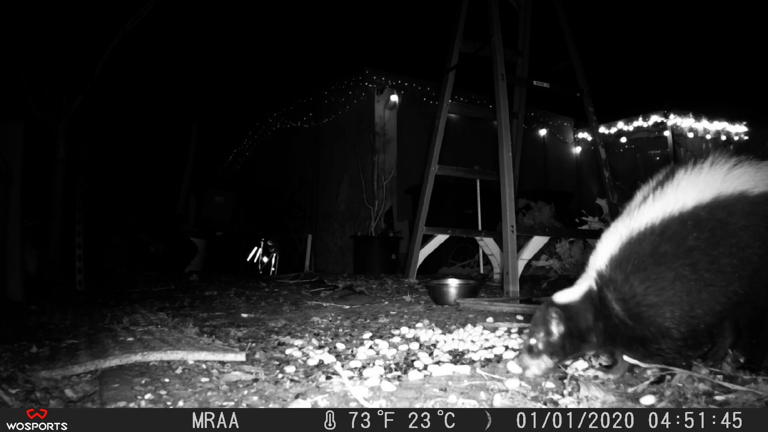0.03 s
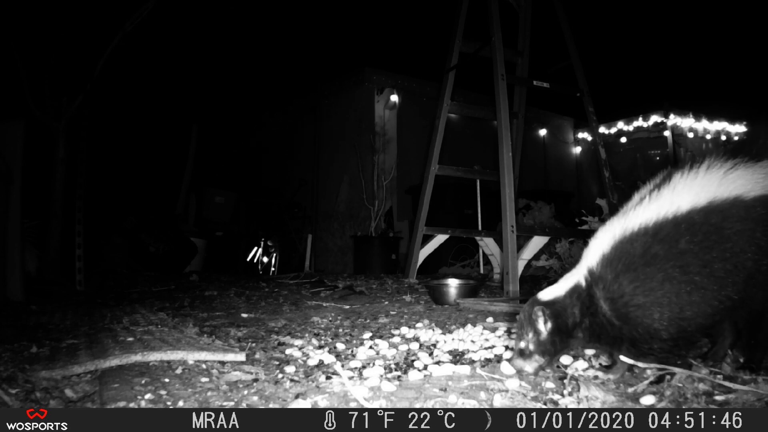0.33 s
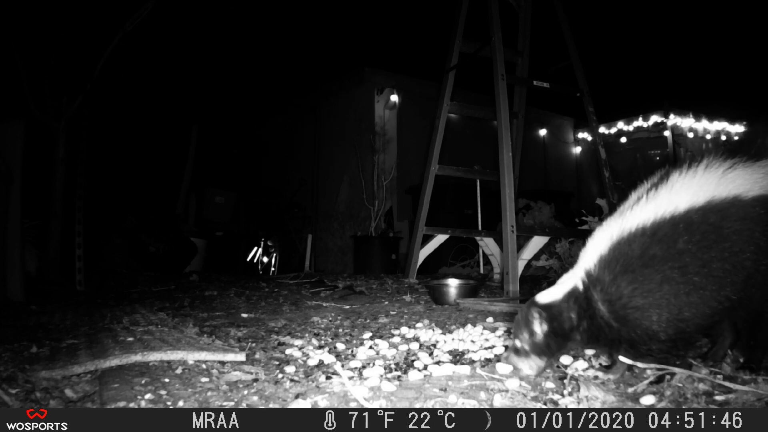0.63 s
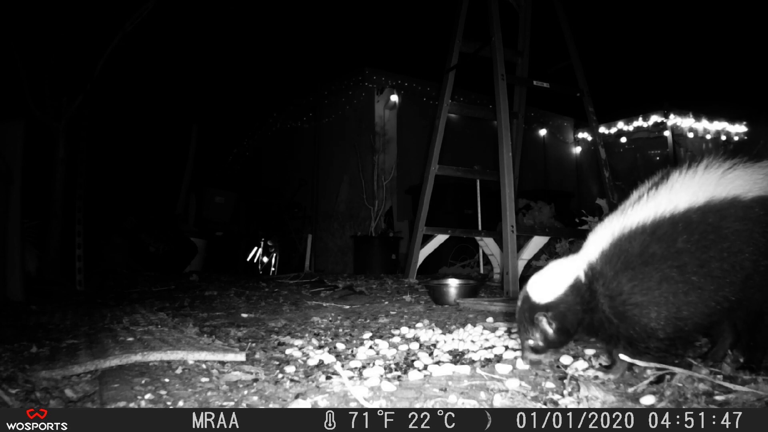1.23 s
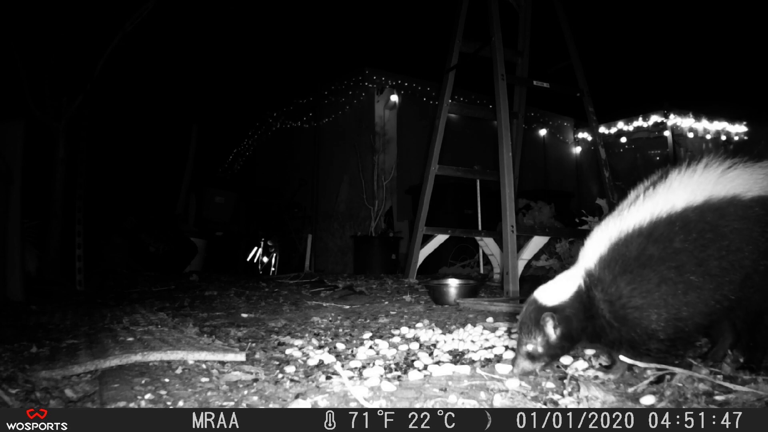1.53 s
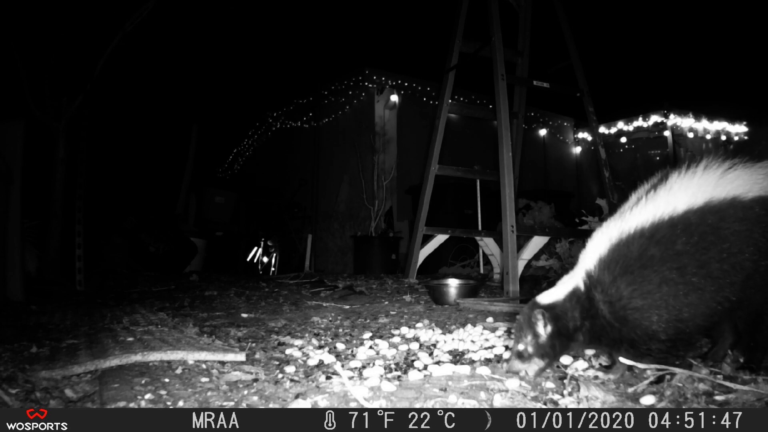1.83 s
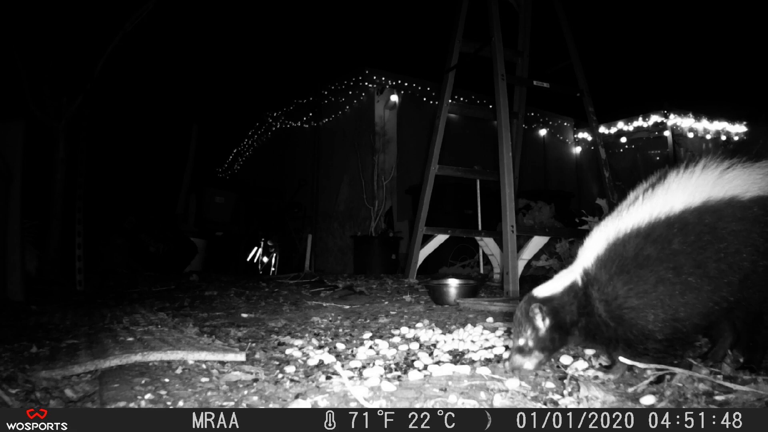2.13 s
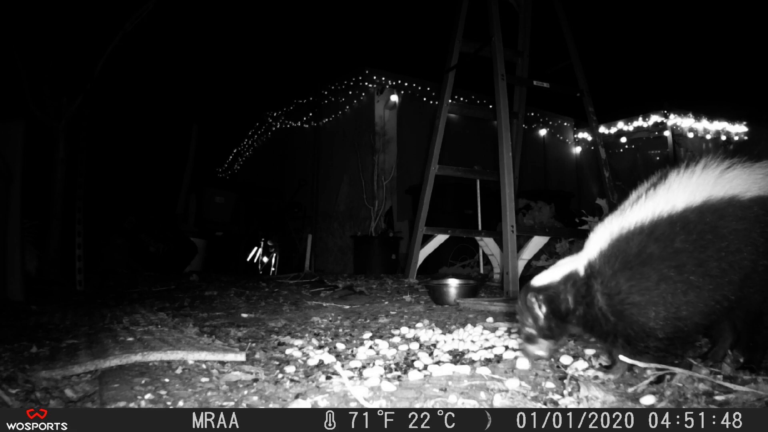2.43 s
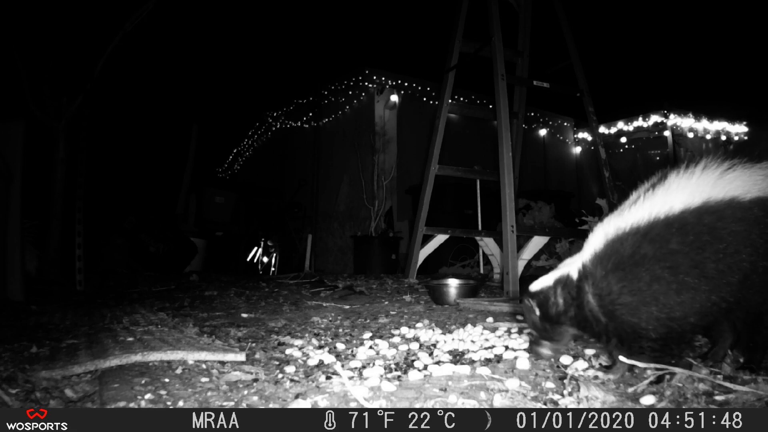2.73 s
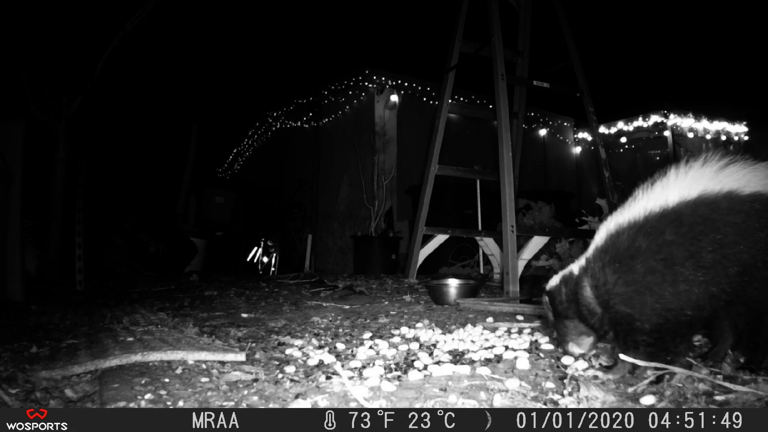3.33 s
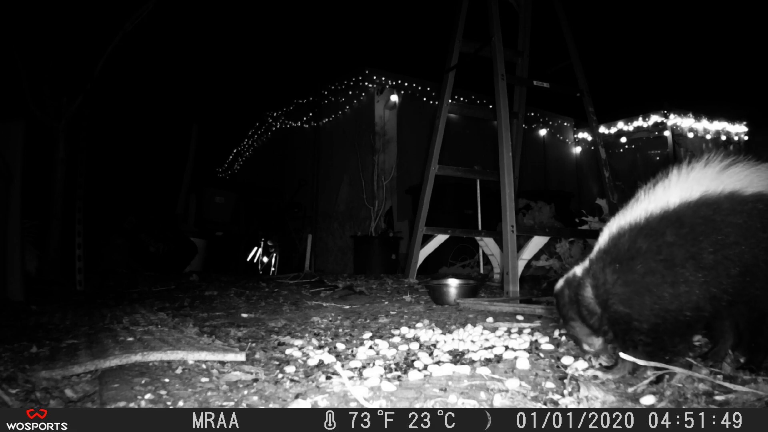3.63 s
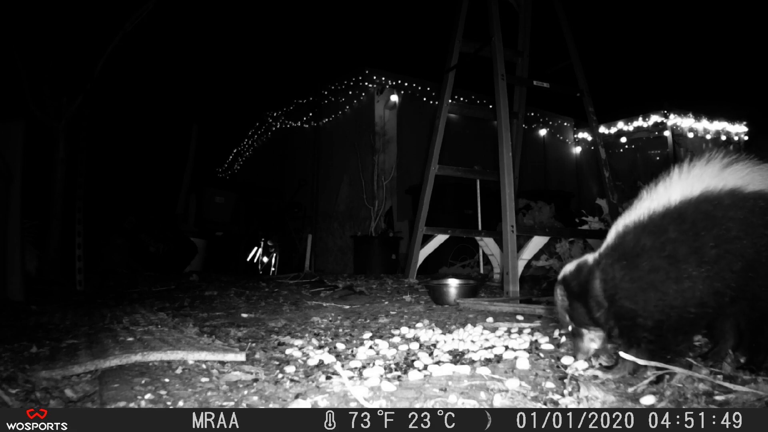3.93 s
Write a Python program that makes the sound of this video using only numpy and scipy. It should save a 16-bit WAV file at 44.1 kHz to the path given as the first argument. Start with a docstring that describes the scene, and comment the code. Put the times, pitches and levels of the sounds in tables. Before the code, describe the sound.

A skunk feeds on dry scraps close to a small microphone in a yard at night. Faint, crisp snaps come irregularly, then thicken with light rustling after one soft knock. Low rumble, distant machine hum and hiss continue underneath.

```python
"""A skunk feeds on dry scraps in a yard at night, close to a small trail camera.
From the start, crumbs snap and grit ticks over a low outdoor rumble, the hum of distant machines
and the microphone's own hiss. Just past halfway one piece knocks on the ground. From there the
snaps come thicker, and snout and paws rustle the litter until near the end."""
import sys
import numpy as np
from scipy import signal
from scipy.fft import rfft, irfft
from scipy.io import wavfile
from scipy.ndimage import uniform_filter1d

SR = 44100
rng = np.random.default_rng(int(sys.argv[2]) if len(sys.argv) > 2 else 0)


def int16_out(signal):
    """Quantize to a 16-bit WAV file."""
    q = np.round(np.clip(np.atleast_2d(signal).T, -1, 1) * 32767)
    wavfile.write(sys.argv[1], SR, q.astype(np.int16))


N = 176400


def amp(db):
    """Decibels to gain."""
    return 10 ** (np.asarray(db) / 20)


def unit(x):
    """Scales to an rms of 1."""
    return x / np.sqrt(np.mean(x ** 2) + 1e-20)


def add(mix, start_s, sound):
    """Mixes a sound in at its cue."""
    part = mix[max(round(start_s * SR), 0):][:len(sound)]
    part += sound[:len(part)]


def drift(t, top_hz):
    """A slow random modulator of rms 1, moving no faster than top_hz."""
    rates = np.geomspace(top_hz / 10, top_hz, 20)
    return unit(sum(np.sin(2 * np.pi * (hz * t + rng.random())) / np.sqrt(hz) for hz in rates))


def ring(pitch_hz, width_hz):
    """One damped mode, struck once: the wider it is, the faster it dies."""
    t = np.arange(SR // 50) / SR
    return np.exp(-np.pi * width_hz * t) * np.sin(2 * np.pi * pitch_hz * t)


def dull(x, cutoff_hz=np.inf):
    """A steep high cut, at 4010 Hz unless set lower."""
    return signal.sosfilt(signal.butter(8, min(cutoff_hz, 4010), fs=SR, output="sos"), x)


# Dry, crisp crumb snaps: start_s, peak_db, pitch_hz
CRUMB_SNAPS = [(0.0768, -49, 2550), (0.146, -59, 3800), (0.1514, -60, 3500), (0.267, -60, 3100),
               (0.2739, -47.5, 2940), (.2849, -47.5, 2900), (0.5723, -60, 3400), (0.757, -60, 3100),
               (0.8598, -59, 3300), (.911, -49.5, 3430), (1.171, -62, 4030), (1.2, -57, 2600),
               (1.2079, -53, 2320), (1.4277, -62, 3230), (1.7005, -51, 2730), (2.0603, -56, 3200),
               (2.0728, -65, 3900), (2.082, -55, 3400), (2.421, -57, 3680), (2.4603, -60, 4000),
               (2.5547, -55, 2750), (2.5709, -55, 2200), (2.664, -50, 1900), (2.6706, -57, 2900),
               (2.778, -62, 3820), (2.8084, -56, 3000), (2.8147, -39, 2700), (2.864, -59, 3600),
               (2.9334, -63, 3520), (2.978, -62, 3750), (3.0853, -53, 2800), (3.0927, -51, 2700),
               (3.3704, -50.5, 2900), (3.475, -56, 2600), (3.767, -52.5, 2580)]


def crumb_snap(peak_db, pitch_hz):
    """A crumb breaks: a bright ring of a few cycles over a duller body, with the bass cut away."""
    bright = ring(pitch_hz, width_hz=800)
    body = amp(-5) * ring(pitch_hz=980, width_hz=800)
    click = dull(bright - body, cutoff_hz=1.29 * pitch_hz)
    click = signal.sosfilt(signal.butter(2, 554, "high", fs=SR, output="sos"), click)
    return amp(peak_db) * click / abs(click).max()


# Thin, glassy ticks of grit: start_s, peak_db, pitch_hz
GRIT_TICKS = [(.1532, -79, 6800), (.2746, -82, 6900), (1.426, -72, 6930), (2.431, -77, 7100),
              (2.4601, -68.5, 7000), (2.547, -72.5, 7000), (2.7556, -71, 7100)]


def grit_tick(peak_db, pitch_hz, attack_s=0.00057):
    """A grain of grit rings briefly and very high."""
    ping = ring(pitch_hz, width_hz=350)
    t = np.arange(len(ping)) / SR
    ping *= 1 - np.exp(-t / attack_s)
    return amp(peak_db) * ping / abs(ping).max()


# Short, grainy brushes of litter: middle_s, half_length_s, level_db, centre_hz, width_hz
LITTER_RUSTLES = [(2.358, 0.049, -71, 2200, 1860), (2.438, .02, -82, 3340, 1480),
                  (2.67, 0.0065, -64.5, 2300, 1400), (2.676, 0.0087, -76, 3800, 1200),
                  (2.812, 0.01, -72, 2770, 1200), (2.908, 0.023, -77.5, 2900, 1700),
                  (3.193, 0.01, -68, 2170, 1100), (3.465, 0.011, -66.5, 2600, 890),
                  (3.763, 0.012, -76, 2520, 795)]


def litter_rustle(middle_s, half_length_s, level_db, centre_hz, width_hz, grains_per_s=3000):
    """Pushed litter gives a swelling, fading cloud of tiny clicks. Returns start_s and the sound."""
    t = np.arange(-SR // 5, SR // 5) / SR
    strengths = rng.standard_normal(len(t))
    clicks = strengths * (rng.random(len(t)) < grains_per_s / SR)
    edges_hz = [centre_hz - width_hz / 2, centre_hz + width_hz / 2]
    band = signal.butter(2, edges_hz, "band", fs=SR, output="sos")
    grains = unit(dull(signal.sosfilt(band, clicks)))
    swell = np.exp(-(t / half_length_s) ** 2 / 2)
    return middle_s + t[0], amp(level_db) * grains * swell


def scrap_knock(middle_s, half_length_s, peak_db, pitch_hz):
    """A piece hits the ground with a soft-edged, hollow knock. Returns start_s and the sound."""
    t = np.arange(-SR // 50, SR // 50) / SR
    envelope = np.exp(-(t / half_length_s) ** 2 / 2)
    return middle_s + t[0], amp(peak_db) * envelope * np.cos(2 * np.pi * pitch_hz * t)


def skunk(knock_s=2.3492, knock_hz=1090):
    """The feeding foley: snaps, ticks, rustles and one knock with a ground scuff around it."""
    foley = np.zeros(N)
    for start_s, peak_db, pitch_hz in CRUMB_SNAPS:
        add(foley, start_s, crumb_snap(peak_db, pitch_hz))
    for start_s, peak_db, pitch_hz in GRIT_TICKS:
        add(foley, start_s, grit_tick(peak_db, pitch_hz))
    for row in LITTER_RUSTLES:
        add(foley, *litter_rustle(*row))
    add(foley, *scrap_knock(knock_s, half_length_s=0.00092, peak_db=-48, pitch_hz=knock_hz))
    add(foley, *litter_rustle(knock_s, half_length_s=0.03, level_db=-67, centre_hz=knock_hz, width_hz=530))
    return foley


def machine_tone(pitch_hz, wander_hz):
    """A machine's sine tone, of rms 1, whose pitch wanders a little."""
    wandering_hz = pitch_hz + wander_hz * drift(np.arange(N) / SR, top_hz=4)
    return unit(np.sin(2 * np.pi * np.cumsum(wandering_hz) / SR))


# Fader ride on the low drone, before its trim: time_s, level_db
DRONE_FADER = [(0.0, -50), (0.05, -43), (0.26, -51), (0.97, -49), (1.14, -71), (1.17, -57), (1.59, -46.5),
               (1.67, -56), (2.18, -47.5), (2.97, -58.5), (3.09, -50.5), (3.17, -60), (3.75, -46.5),
               (4.0, -53)]
# Partials of the mains hum: pitch_hz, level_db
HUM_PARTIALS = [(119.8, -61.5), (360, -81), (540, -80.5), (780, -84)]


def distant_machines(drone_trim_db=-1, hum_waver_db=1.5):
    """Far-off machines: a low drone that swells and sinks, and a wavering mains hum."""
    t = np.arange(N) / SR
    drone_db = np.interp(t, *np.transpose(DRONE_FADER)) + drone_trim_db
    drone = amp(drone_db) * machine_tone(pitch_hz=65.37, wander_hz=0.57)
    hum = np.zeros(N)
    for pitch_hz, level_db in HUM_PARTIALS:
        gain = amp(level_db + hum_waver_db * drift(t, top_hz=3))
        hum += gain * machine_tone(pitch_hz, wander_hz=0.46)
    return drone + hum


# EQ curve of the noise bed, deep rumble up to thin hiss: frequency_hz, relative_db
AIR_EQ = [(5, -7.5), (20, 0.5), (45, 2.5), (80, -0.5), (110, -4.5), (150, -6), (195, -9), (240, -12),
          (320, -17), (420, -20), (750, -22), (1100, -27), (1600, -33), (2100, -35), (2700, -39),
          (3300, -43), (4000, -51), (4700, -57), (5200, -58), (6000, -53), (6600, -48.5), (7000, -49),
          (7250, -54), (7500, -65)]


def air_and_hiss(level_db=-50, patch_db=0.46, swell_db=0.5):
    """Outdoor rumble and microphone hiss: steady noise with faint drifting patches and swells."""
    framing = dict(nperseg=1024, noverlap=768)
    _, t, spectra = signal.stft(rng.standard_normal(N), SR, **framing)
    patches = uniform_filter1d(rng.standard_normal(spectra.shape), size=12, axis=0)  # smooth in pitch
    patches = unit(uniform_filter1d(patches, size=16, axis=1))  # and in time
    spectra *= amp(patch_db * patches + swell_db * drift(t, top_hz=2.2))
    noise = signal.istft(spectra, **framing)[1][:N]
    frequency_hz, relative_db = np.transpose(AIR_EQ)
    bins_hz = np.fft.rfftfreq(N, 1 / SR)
    eq = amp(np.interp(np.log(bins_hz + 1), np.log(frequency_hz), relative_db))
    return amp(level_db) * unit(irfft(rfft(noise) * eq, N))


def scene():
    """The skunk up front, the night ambience behind, in mono."""
    return (skunk() + air_and_hiss() + distant_machines())[None]


def record(dry):
    """The camera's narrow bandwidth cuts the top end above 7550 Hz."""
    high_cut = signal.firwin(511, 7550, window=("kaiser", 8), fs=SR)
    return signal.oaconvolve(dry, high_cut[None], "same")


dry = scene()
out = record(dry)
int16_out(out)
```